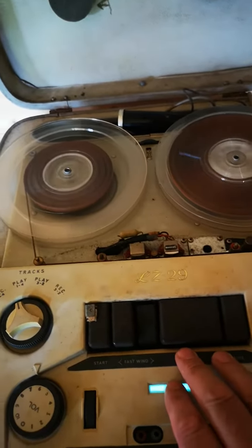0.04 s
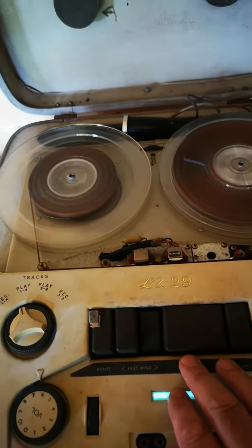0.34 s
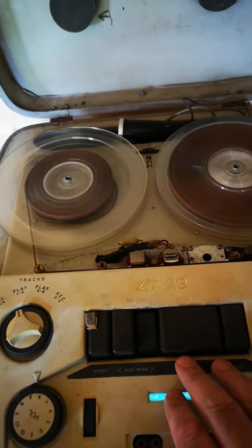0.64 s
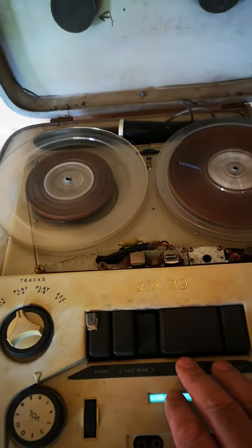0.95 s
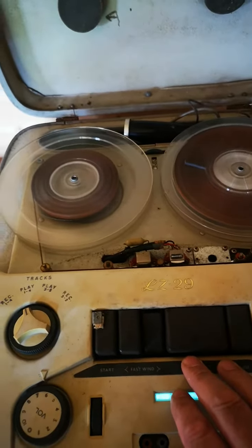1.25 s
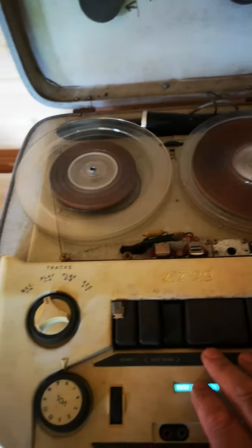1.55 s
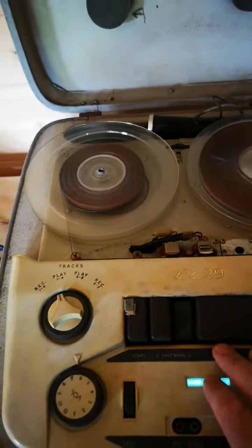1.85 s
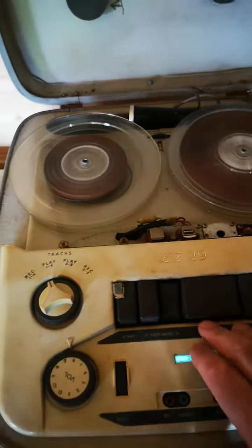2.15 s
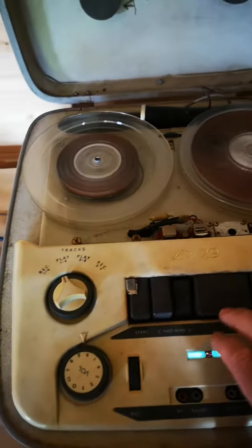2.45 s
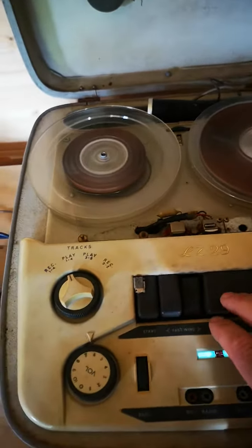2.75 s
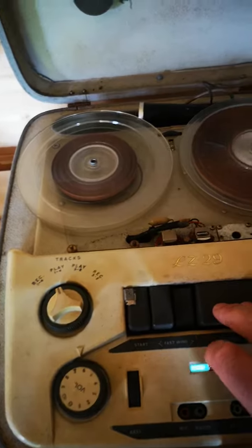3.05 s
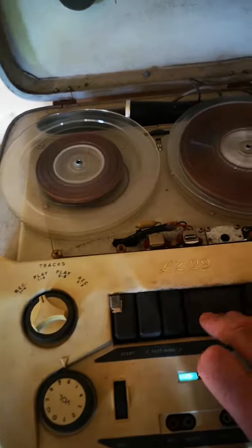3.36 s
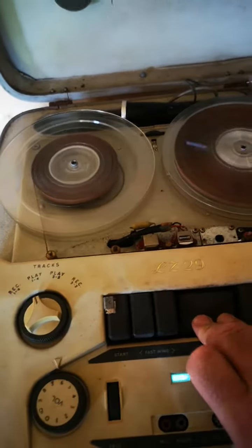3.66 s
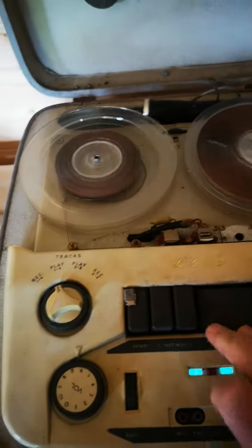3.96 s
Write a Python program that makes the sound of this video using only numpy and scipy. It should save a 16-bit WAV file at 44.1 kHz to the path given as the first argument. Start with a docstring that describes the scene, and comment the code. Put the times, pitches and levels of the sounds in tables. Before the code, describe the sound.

Tape reels spin ever faster, ticking and humming, until a stop key clunks.

```python
"""Tape recorder winding fast

An open-reel machine winds close by in a small room. Its dented drive wheel rumbles through the chassis and a
reel ticks once per turn, faster and faster, then slower at the end, over the rush of tape and a few dull bumps.
The drive clacks three times, the brake pads hiss and the stop key clunks; the reels coast down with a thin
falling whistle."""
import sys
import numpy as np
from scipy import signal
from scipy.fft import rfft, irfft, next_fast_len
from scipy.io import wavfile
from scipy.ndimage import uniform_filter1d, map_coordinates

SR = 44100
rng = np.random.default_rng(int(sys.argv[2]) if len(sys.argv) > 2 else 0)


def log_audio(samples):
    """Write samples as a 16-bit WAV file to the path given in sys.argv[1]."""
    # one column per channel
    frames = np.atleast_2d(samples).T
    # limit to full scale, then quantise
    limited = np.clip(frames, -1, 1)
    pcm = np.round(limited * 32767).astype(np.int16)
    wavfile.write(sys.argv[1], SR, pcm)


N = 176400

# The wheel's turns, one reel tick each. Each row: start in seconds, tick level in dB, leftward pan in dB.
TURNS = [(.003,-24.5,-3),(0.135,-29,-10),(0.2614,-24,-10),(0.3827,-23.5,-9),(0.5016,-24.5,-9.5),(0.617,-23.5,-5),(0.7296,-24,-3.5),(0.8392,-22,-7.5),(0.9439,-27,-5),
         (1.0478,-22,-2),(1.1484,-29,-6),(1.2489,-23,-3),(1.3466,-35.5,-8.5),(1.4426,-25,-1.5),(1.536,-26.5,-4.5),(1.6278,-33.5,-2),(1.719,-26,-8),(1.8087,-34.5,-4),
         (1.897,-25,1),(1.9838,-30.5,-4.5),(2.0691,-21,-5),(2.155,-32.5,-1.5),(2.238,-23,-3.5),(2.3207,-30,-7),(2.4039,-23,-5),(2.4833,-30.5,-5),(2.562,-24,-7.5),
         (2.6413,-27,-5),(2.719,-18,-5),(2.7982,-31,-1),(2.8722,-23.5,-2),(2.9494,-32.5,-0.5),(3.024,-25,-3),(3.0972,-30.5,2),(3.1714,-20.5,-5.5),(3.2446,-35.5,-7),
         (3.316,-23,-4),(3.3892,-31,-2),(3.461,-18.5,-6),(3.5331,-19.5,-6.5),(3.6102,-28,-3.5),(3.6986,-33.5,-7),(3.7974,-30.5,-3),(3.909,-32,-6)]


def amp(db):
    return 10 ** (np.asarray(db) / 20)


def unit(x):
    return x / np.sqrt(np.mean(x ** 2) + 1e-20)


def along(points, hz):
    """Read (Hz, value) points along a log frequency axis."""
    f, v = np.transpose(points)
    return np.interp(np.log(hz + 1), np.log(f + 1), v)


def curves(rows):
    """One automation curve for each column after the time."""
    s, *cols = np.transpose(rows)
    return [np.interp(np.arange(N) / SR, s, c) for c in cols]


def wobble(rate):
    """A smooth random curve, rate knots a second."""
    return map_coordinates(rng.standard_normal(N // 8), [np.arange(N) * rate / SR], mode='wrap')


def filtered(x, response):
    """Filter x by a response given as a function of Hz."""
    m = next_fast_len(N + SR // 2)
    return irfft(rfft(x, m) * response(np.fft.rfftfreq(m, 1 / SR)), m)[..., :N]


def colour(x, points, size=16384):
    """Minimum-phase EQ of unit energy with the given (Hz, dB) shape."""
    cepstrum = irfft(np.log(amp(along(points, np.fft.rfftfreq(size, 1 / SR)))))
    cepstrum[1:size // 2] *= 2
    cepstrum[size // 2 + 1:] = 0
    impulse = irfft(np.exp(rfft(cepstrum)))
    return filtered(x, lambda hz: rfft(impulse / np.linalg.norm(impulse), next_fast_len(N + SR // 2)))


def pan(db):
    """Stereo gains that favour the left by db."""
    return amp(np.array([[1], [-1]]) * db / 2)


def noise_pair():
    """Stereo white noise, nearly mono in the bass and wide at the top."""
    # Each row: frequency in Hz, left-right correlation.
    likeness = [(100,0.94),(350,0.36),(700,0.61),(3000,0.41),(12000,0.092)]
    a, b = rng.standard_normal((2, N))
    spread = lambda hz: np.arccos(np.clip(along(likeness, hz), -1, 1)) / 2
    mid = filtered(a, lambda hz: np.cos(spread(hz)))
    side = filtered(b, lambda hz: np.sin(spread(hz)))
    return np.array([mid + side, mid - side])


def add(track, s, sound):
    """Mix a sound into a track at time s."""
    i = int(np.clip(round(s * SR), 0, N - 1))
    track[..., i:i + sound.shape[-1]] += sound[..., :N - i]


def drive_wheel():
    """The wheel drops into each dent and climbs out, shaking the chassis; its uneven rim hums."""
    # Each row: a dent's place, length and edge width, all in turns, then its depth in dB.
    dents = [(0.298,0.0327,0.03,-0.5),(0.527,0.0374,0.021,-1),(0.613,0.025,0.0224,-2),(0.796,0.0791,0.047,3)]
    # The chassis resonance. Each row: frequency in Hz, gain in dB.
    chassis = [(20,-12.5),(32,-12.5),(46,1),(70,3),(100,-1),(130,1.5),(172,-9.5),(235,-3),(270,-7.5),(305,-21.5),(342,-5.5),(385,-23),(430,-37.5),(550,-30.5),(700,-53.5),(1200,-37.5),(3000,-104)]
    # The hum of a rim slightly out of round. Each row: cycles per turn, level in dB.
    harmonics = [(4,-6.5),(5,-14.5),(6,-26),(9,-16)]
    # The rumble's fader. Each row: time in seconds, gain in dB.
    swell = [(0,-21),(.08,-37),(.12,-46),(.19,-40.5),(.22,-33),(.5,-30.5),(1,-25),(1.35,-24),(1.65,-22),(2.5,-21.5),(2.85,-19.5),(3.44,-18),(3.54,-26),(3.68,-21),(4,-30)]
    last_turn_s, jitter_s, hum_unity_turn_s = .14, .0006, .065
    starts = [row[0] for row in TURNS] + [TURNS[-1][0] + last_turn_s]
    counts, turn_s = np.arange(len(starts)), np.gradient(starts)
    revs = np.interp(np.arange(N) / SR, starts, counts)
    turn, jolts = revs.astype(int), np.zeros(N)
    for place, length, edge, db in dents:
        strength, late, soft = rng.standard_normal((len(starts), 3)).T  # no two turns alike
        width = (edge * np.exp(.15 * soft))[turn]
        since = revs - turn - place - (jitter_s * late / turn_s)[turn]
        slope = lambda u: np.sin(np.pi * np.clip(u / width, 0, 1)) ** 2 / width
        jolts += amp(db + 1.8 * strength)[turn] * (slope(since - length) - slope(since))
    hum = sum(amp(db + 1.5 * wobble(14)) * np.sqrt(2) * np.sin(2 * np.pi * round(cycles) * revs)
              for cycles, db in harmonics)
    hum *= (hum_unity_turn_s / np.interp(revs, counts, turn_s)) ** 2.3  # grows with speed
    rolling = amp(-11) * unit(colour(noise_pair(), chassis))
    swell_db, = curves(swell)
    return amp(swell_db) * (unit(colour(jolts, chassis)) + hum + rolling)


def reel_ticks():
    """Once a turn a short scrape rings the reel's plastic flange, its modes in changing strengths."""
    # The scrape's tone. Each row: frequency in Hz, gain in dB.
    scrape_eq = [(500,-35),(1400,-9.5),(1900,-4.5),(2300,1),(2850,3),(3250,-1.5),(3700,1),(4300,2),(5200,1.5),(5950,0),(6350,-4.5),(6650,1),(7550,2.5),(8250,-8.5),(9400,-8),(11500,-16.5),(15000,-17.5)]
    # The flange's ring. Each row: frequency in Hz, bandwidth in Hz, gain in dB.
    modes = [(1851,21,12),(2040,16,4),(2646,65,4.5),(2963,119,7.5),(3634,145,5),(4700,22,-5),(5820,384,4),(7020,350,-13.5),(9020,380,-1)]
    # Each row: frequency in Hz, leftward pan in dB.
    image = [(1200,12),(2000,20.5),(3000,19.5),(4500,5.5),(5200,2),(5900,-0.5),(7300,-5),(9000,-0.5),(12000,4)]
    rise_s, hold_s, t60, treble_hz = .0011, .002, .05, 7500
    t, force = np.arange(SR // 8) / SR, np.zeros((2, N))
    envelope = np.minimum(t / rise_s, 1) * amp(-60 * np.maximum(t - hold_s, 0) / t60)
    for s, db, pan_db in TURNS:
        add(force, s - rise_s / 2, amp(db - 10) * pan(pan_db) * envelope)
    scrape = room(colour(force * noise_pair(), scrape_eq), wet_db=-10)
    ring = np.zeros((2, N))
    for hz, width, db in modes:
        resonance = signal.lfilter(*signal.iirpeak(hz, hz / width, fs=SR), scrape)
        ring += amp(db + 3.5 * wobble(10)) * resonance
    treble = filtered(scrape, lambda hz: 1 - 1 / (1 + (hz / treble_hz) ** 6))
    flicker = (amp(2.5 * wobble(10)) - 1) * treble
    return filtered(scrape + flicker + ring, lambda hz: pan(along(image, hz)))


def blow(contacts, crack_eq, modes, crack_t60, crack_db, ring_db):
    """A hard hit at time zero: a few cracking contacts and the modes they ring, blurred by loose parts."""
    blur_hz, rise_s = 45, .0012
    t, force, ring = np.arange(SR // 4) / SR, np.zeros(N), np.zeros((2, N))
    for delay_s, db in contacts:
        add(force, delay_s, amp(db - 60 * t / crack_t60))
    for hz, db, t60 in modes:
        drift = np.cumsum(rng.standard_normal((2, len(t))), axis=1)
        rattle = uniform_filter1d(drift, size=128) * np.sqrt(2 * np.pi * blur_hz / SR)
        swing = np.sin(2 * np.pi * (hz * t + rng.random()) + rattle) * (1 - np.exp(-t / rise_s))
        add(ring, 0, amp(db + rng.normal(0, 1.1, (2, 1)) - 60 * t / t60) * swing)
    return amp(crack_db) * colour(force * noise_pair(), crack_eq) + amp(ring_db) * ring


def drive_clacks():
    """The drive catches: a dull crack, a long faint ring and a short thud of the chassis."""
    # Each row: start in seconds, level in dB, leftward pan in dB.
    cues = [(1.0806,-21,4),(1.2796,-17.5,4.5),(3.1973,-12.5,6)]
    # The contacts within a clack. Each row: delay in seconds, level in dB.
    contacts = [(0,-4),(.0025,1.5),(.0145,-16)]
    # Each row: frequency in Hz, gain in dB.
    crack_eq = [(200,-5.5),(450,-2),(750,-7.5),(1050,-3.5),(1250,-13.5),(1600,-0.5),(2000,0.5),(2500,-2),(3000,-5.5),(3600,-16.5),(4300,-25),(8000,-44),(15000,-54)]
    # The ring and the thud. Each row: frequency in Hz, level in dB, T60 in seconds.
    ring_modes = [(1020,0,0.04),(1300,-13,0.23),(1456,-10,0.2),(1630,-4.5,0.19),(1763,-11.5,0.16),(1975,6.5,0.031),(2050,0.5,0.03),(2509,-7,0.11),(2790,-15,0.1)]
    thud_modes = [(101,2.5,0.03),(215,2.5,0.025),(342,-4.5,0.043)]
    t, knocks, thuds = np.arange(SR // 4) / SR, np.zeros((2, N)), np.zeros(N)
    thud = sum(np.sin(2 * np.pi * hz * t) * amp(db - 60 * t / t60) for hz, db, t60 in thud_modes)
    thud *= 1 - np.exp(-t / .0012)
    for s, db, pan_db in cues:
        knock = blow(contacts, crack_eq, ring_modes, crack_t60=.021, crack_db=-3.5, ring_db=-12)
        add(knocks, s, amp(db) * pan(pan_db) * knock)
        add(thuds, s, amp(db) * thud)
    return room(knocks, wet_db=-8.5) + thuds


def stop_key():
    """The key snaps home with a bright crack and rings the deck plate."""
    # Each row: delay in seconds, level in dB.
    contacts = [(0,-10.5),(.0018,3),(.0046,-7.5),(.011,-14)]
    # Each row: frequency in Hz, gain in dB.
    crack_eq = [(200,-14.5),(700,-11),(1050,-7.5),(1900,-1.5),(2600,-6),(3500,-5.5),(4200,-15.5),(5000,-16),(8000,-24.5),(15000,-43)]
    # Each row: frequency in Hz, level in dB, T60 in seconds.
    plate_modes = [(607,-6,.07),(740,-18,0.17),(1288,-1,0.075),(1453,-5,0.077),(1675,-5.5,.11),(1880,7,0.087),(2310,5,0.032),(2800,-17,.12),(3300,-23,0.074),(3460,1,0.023),(3870,-7,0.034),(4340,-21,0.13)]
    clunk = blow(contacts, crack_eq, plate_modes, crack_t60=.018, crack_db=-4, ring_db=-9.5)
    track = np.zeros((2, N))
    add(track, s=3.495, sound=amp(-7.5) * pan(db=1.5) * clunk)
    return room(track, wet_db=-7.5)


def case_bumps():
    """Each dull bump pushes the case and lets it spring back."""
    # Each row: start in seconds, level in dB.
    cues = [(1.549,-22),(1.6409,-16),(1.7323,-24.5),(1.8226,-19.5),(3.199,-21),(3.495,-25)]
    # The case's boom. Each row: frequency in Hz, gain in dB.
    case_eq = [(20,-45),(70,-12),(125,4),(230,7),(300,-9),(345,-1),(430,-27.5),(560,-17.5),(700,-47.5),(1200,-43),(3000,-76)]
    push_db, return_s = 23.5, .00414
    pushes = np.zeros(N)
    for s, db in cues:
        push = amp([db + push_db])
        add(pushes, s, push)
        add(pushes, s + return_s, -push)
    return colour(pushes, case_eq)


def tape_rush():
    """Tape and bearings make a fluttering rush that swells through the wind and thins to a hiss."""
    # Each row: time in seconds, body level in dB, hiss level in dB.
    faders = [(0,-56.5,-60),(.4,-55,-57.5),(1.3,-49,-59.5),(1.9,-46,-62),(2.5,-44,-55),(2.85,-39,-55.5),(3.45,-39,-54),(3.56,-45.5,-51),(3.7,-49,-46),(4,-55,-49.5)]
    # The tone of each layer. Each row: frequency in Hz, gain in dB.
    body_eq = [(200,3.5),(550,2),(750,-3),(1000,0.5),(1300,-7),(1900,-2),(2800,-3),(3800,-19),(6000,-18),(15000,-52)]
    hiss_eq = [(500,-5),(2000,5.5),(3000,3.5),(4300,2),(6000,4),(7600,1.5),(8600,-3.5),(11000,-12.5),(15000,-13)]
    # Each row: frequency in Hz, leftward pan in dB.
    image = [(500,2),(2500,5),(4500,6),(7000,-7),(12000,-3.5)]
    body_db, hiss_db = curves(faders)
    flutter_db = 2.5 * wobble(90)
    body = amp(body_db + flutter_db) * colour(noise_pair(), body_eq)
    hiss = amp(hiss_db + flutter_db / 2) * colour(noise_pair(), hiss_eq)
    return filtered(body + hiss, lambda hz: pan(along(image, hz)))


def tape_whistle():
    """The tape's breathy whistle sinks as the reels slow down."""
    # Each row: time in seconds, pitch in Hz, level in dB.
    glide = [(3.53,6090,-64),(3.572,5950,-50),(3.595,5660,-54),(3.645,5430,-56),(3.72,4810,-57.5),(3.82,4265,-56),(3.872,4110,-48),(3.895,3970,-60),(3.955,3725,-51),(4,3670,-68)]
    # Each row: ratio to the pitch, level in dB.
    partials = [(.63,-4.5),(1,1.5),(2,-9)]
    width_hz, top_hz = 160, 8000
    pitch_hz, level_db = curves(glide)
    phase = 2 * np.pi * np.cumsum(pitch_hz) / SR
    breath = lambda: wobble(2 * width_hz)  # widens each partial into a band of noise
    tone = sum(amp(db) * (breath() * np.cos(k * phase) + breath() * np.sin(k * phase))
               for k, db in partials)
    tone *= amp(level_db) * (np.arange(N) / SR > glide[0][0])
    tone = filtered(tone, lambda hz: 1 / (1 + (hz / top_hz) ** 10))
    return room(tone * pan(db=.5), wet_db=1.5)


def brake_hiss():
    """The brake pads rub with a faint hiss that comes in quickly and fades."""
    # Each row: frequency in Hz, gain in dB.
    pad_eq = [(1000,-4),(3000,3),(6000,-6),(8500,-1),(11000,-11),(15000,5)]
    start_s, rise_s, level_db, fade_db_per_s = 3, .024, -50, 23
    t = np.maximum(np.arange(N) / SR - start_s, 0)
    envelope = np.minimum(t / rise_s, 1) * amp(level_db - fade_db_per_s * t)
    return envelope * colour(noise_pair(), pad_eq)


def room(x, wet_db):
    """The small room adds a short diffuse tail whose top dies first."""
    # Each row: frequency in Hz, T60 in seconds.
    decay_times = [(150,0.3),(1000,0.23),(3000,0.22),(7000,0.23),(14000,0.11)]
    hz, t, noise = signal.stft(rng.standard_normal((2, SR // 2)), SR, nperseg=256)
    envelope = amp(-60 * t / along(decay_times, hz)[:, None]) * (1 - np.exp(-t / .00085))
    tail = signal.istft(noise * envelope, SR, nperseg=256)[1]
    return x + amp(wet_db) * signal.fftconvolve(x, tail / np.linalg.norm(tail[0]), axes=1)[:, :N]


def scene():
    """The deck is nearer the left side and arrives there first; rumble and bumps sit in the centre."""
    left_lead_s = .0005865
    deck = reel_ticks() + tape_rush() + drive_clacks() + stop_key() + brake_hiss() + tape_whistle()
    deck = filtered(deck, lambda hz: np.exp(1j * np.pi * hz * left_lead_s * np.array([[1], [-1]])))
    return deck + drive_wheel() + case_bumps()


def record(dry):
    """Soft clipping rounds the highest peaks; filters trim the deepest bass and the very top."""
    ceiling, low_hz, top_hz = .93, 30, 15300
    rounded = dry / (1 + (dry / ceiling) ** 6) ** (1 / 6)
    return filtered(rounded, lambda hz: hz ** 4 / (hz ** 4 + low_hz ** 4) / (1 + (hz / top_hz) ** 100))


dry = scene()
out = record(dry)
log_audio(out)
```